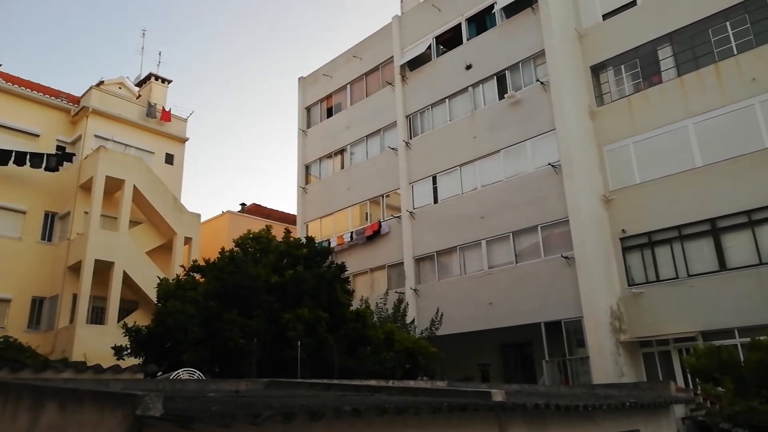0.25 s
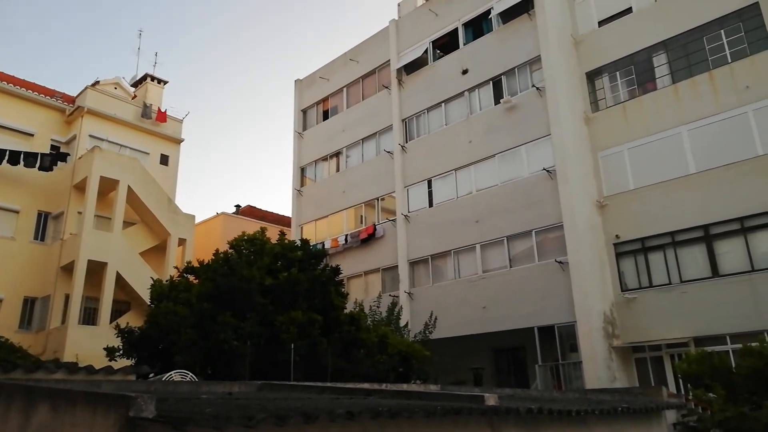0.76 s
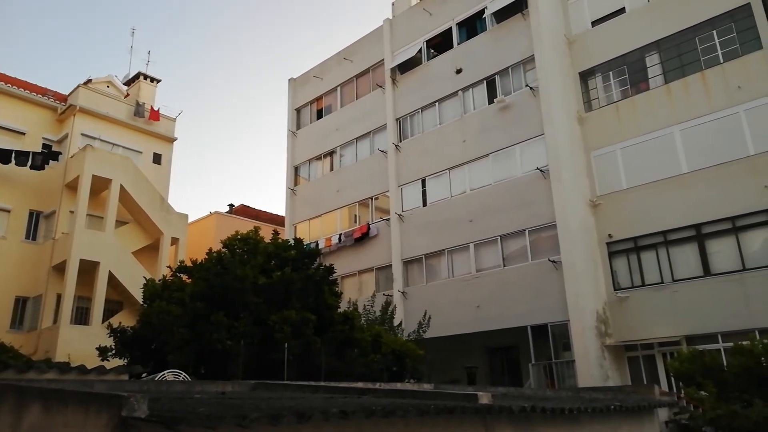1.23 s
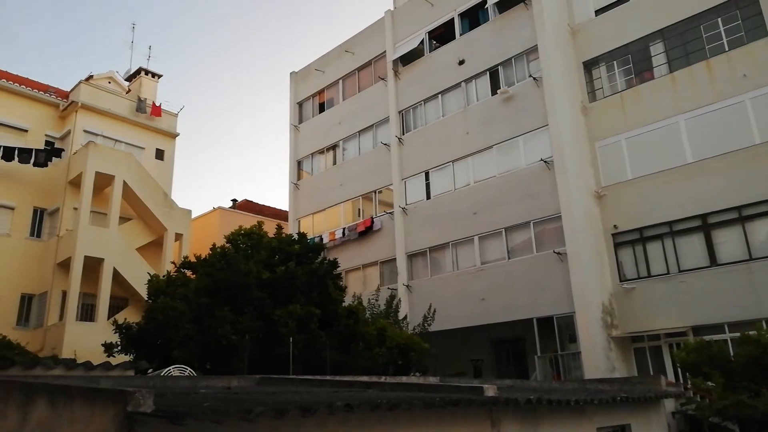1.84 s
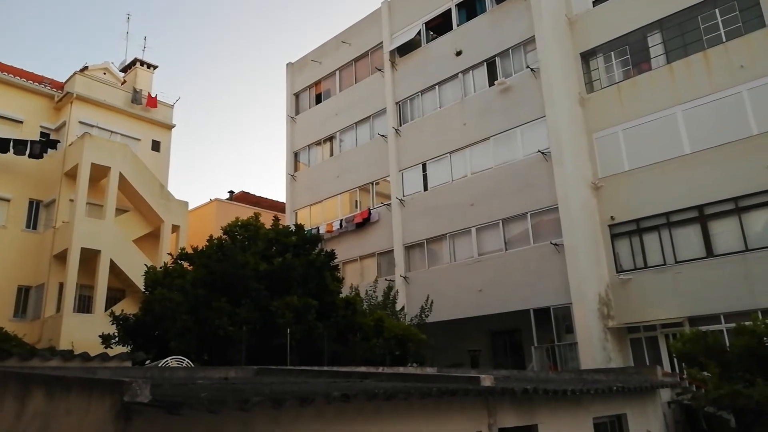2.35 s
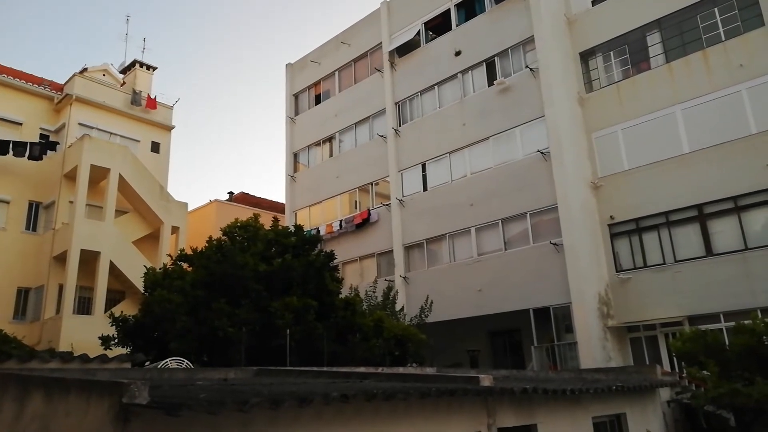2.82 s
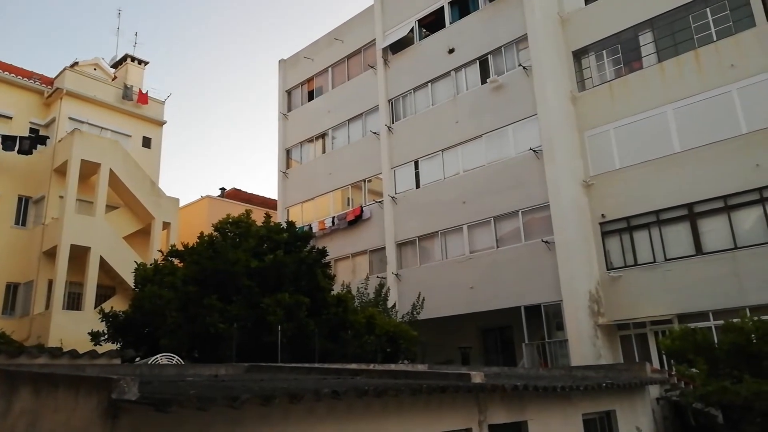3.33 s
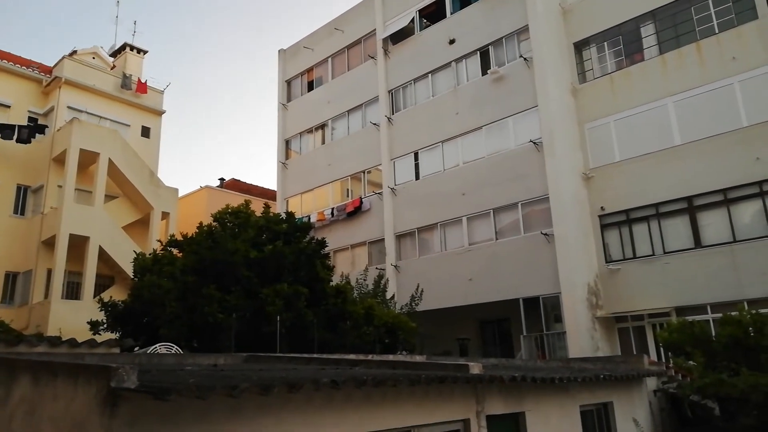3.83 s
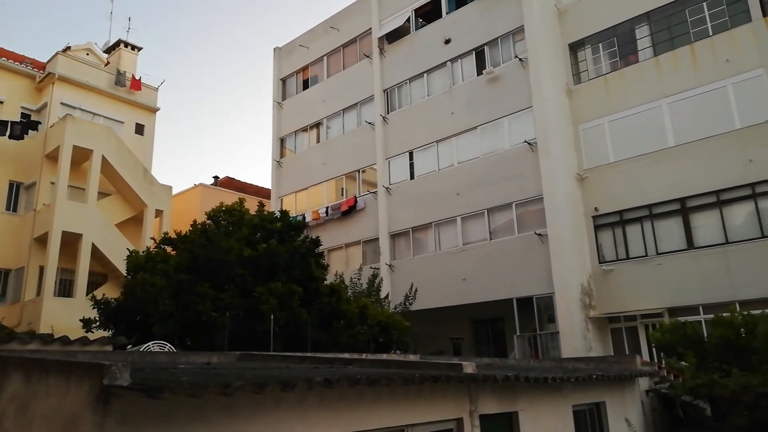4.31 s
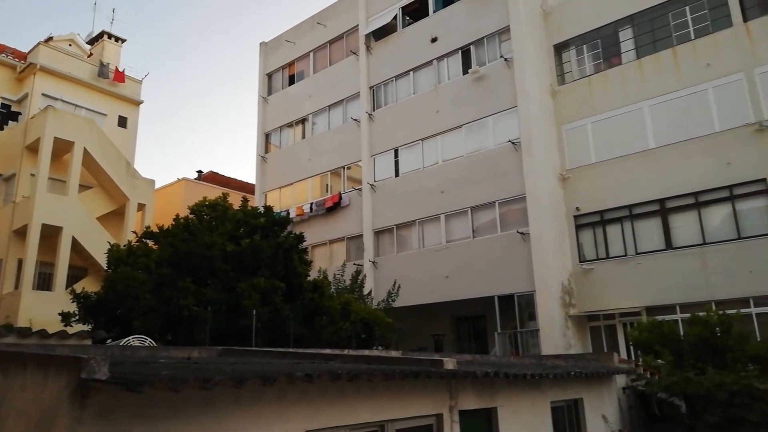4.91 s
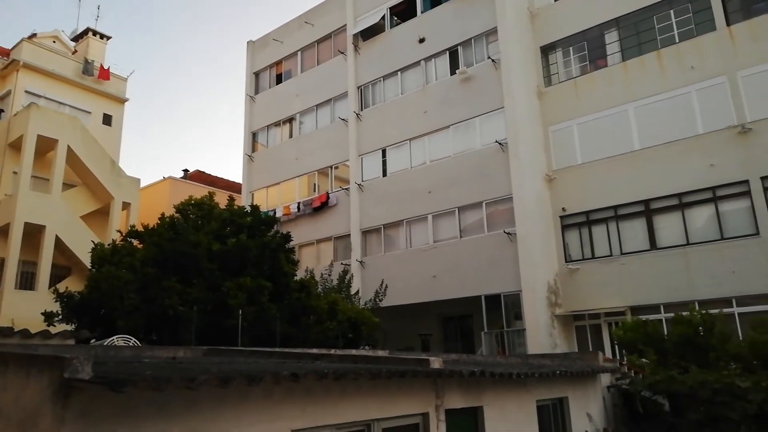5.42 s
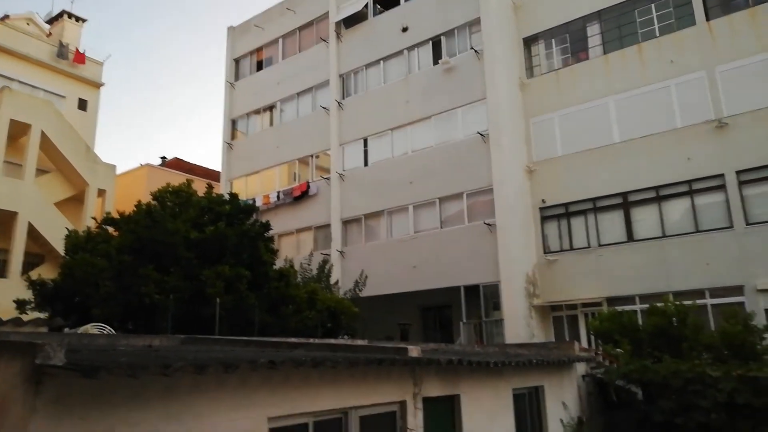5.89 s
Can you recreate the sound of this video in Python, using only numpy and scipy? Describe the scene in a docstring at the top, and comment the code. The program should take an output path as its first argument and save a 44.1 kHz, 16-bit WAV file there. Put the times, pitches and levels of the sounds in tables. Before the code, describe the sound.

For about six seconds house sparrows chirp in a courtyard enclosed by apartment buildings. A sliding chirp on the left opens at 0.1 s, followed by a distant hoarse call and low peeps; a strong stepped chirp comes from the left at 0.8 s. Around 1.4 to 2.2 s left and centre birds alternate quickly. A softer, thinner, higher call comes at 2.5 s, then more falling chirps and peeps crowd together through 3.6 s, where a cheep sits slightly right. A tiny dry tick snaps at 3.9 s. Bright central chirps stand out at 4.2, 5.0 and 5.8 s, with left answers between and a longer faint rasp near 5.5 s. Each note is brief, gritty and mostly falling, with smeared wall echoes and a short tail. Very quiet traffic rumble, slowly sinking, wavering machine hum and faint hiss lie beneath, in wide stereo.

```python
"""Sparrows in a courtyard

House sparrows chirp between apartment blocks on a quiet morning, over the low rumble of the town.
Each chirp is a rough, two-voiced whistle with overtones and a harsh edge of shaped noise.
The facades throw it back as smeared echoes and a fading tail. Hoarse calls and short peeps
come between. Shaped noise makes the traffic and hiss, wavering tones the machine hum."""
import sys
import numpy as np
from scipy import signal
from scipy.fft import rfft, irfft
from scipy.io import wavfile
from scipy.ndimage import uniform_filter1d

SR = 44100
rng = np.random.default_rng(int(sys.argv[2]) if len(sys.argv) > 2 else 0)


def wrap_up_sound(samples):
    """Save the sound to the file named by the first command line argument, as 16-bit audio."""
    columns = np.atleast_2d(samples).T
    # keep every value between -1 and 1, then stretch to whole-number steps
    tamed = np.clip(columns, -1, 1)
    steps = np.round(tamed * 32767).astype(np.int16)
    wavfile.write(sys.argv[1], SR, steps)


N = 271215
TIME, FREQ = np.arange(N) / SR, np.fft.rfftfreq(N, 1 / SR)


def from_db(db):
    """Decibels to gain."""
    return 10 ** (np.asarray(db) / 20)


def rms_one(x):
    """Scale to unit power."""
    return x / np.sqrt(np.mean(x ** 2) + 1e-20)


def at_hz(points, hz):
    """Read a table between its points, on a log-frequency axis."""
    f, value = np.transpose(points)
    return np.interp(np.log(np.maximum(hz, 1)), np.log(f), value)


def panned(db):
    """Left and right gains for a level difference; positive is louder on the left."""
    return from_db(np.array([[db], [-db]]) / 2)


def wander(size, hz):
    """Random motion, mostly slower than the given rate, spread 1."""
    f = np.fft.rfftfreq(size, 1 / SR)
    return rms_one(irfft(rfft(rng.standard_normal(size)) / (1 + (f / hz) ** 2), size))


def coloured(x, spectrum):
    """Shape a sound by a spectrum; rms 1."""
    gain = from_db(at_hz(spectrum, np.fft.rfftfreq(len(x), 1 / SR)))
    return rms_one(irfft(rfft(x) * gain, len(x)))


# how alike the two sides are: pitch_hz, correlation (no unit)
LIKENESS = [(40, .997), (90, 1), (180, 0.96), (300, 0.9), (450, 0.41), (650, 0.42), (1000, 0.1),
            (1500, 0.14), (3000, .02)]
# how far the left side trails: pitch_hz, phase_radians
LEFT_TRAIL = [(30, .03), (120, 0.17), (300, 0.61), (450, 2.18), (650, 3), (1000, 3.25), (1500, 5.6)]


def stereo_noise(spectrum):
    """Noise from all around: long bass waves reach both sides alike, the treble does not; rms 1."""
    mid, side = rfft(rng.standard_normal((2, N)))
    alike = np.clip(at_hz(LIKENESS, FREQ), -.999, .999)
    both = np.sqrt(1 + alike) * mid + np.sqrt(1 - alike) * side * [[1], [-1]]
    both[0] *= np.exp(-1j * at_hz(LEFT_TRAIL, FREQ))
    return rms_one(irfft(both * from_db(at_hz(spectrum, FREQ)), N))


# colour of the far traffic: pitch_hz, relative level_db per Hz
TRAFFIC = [(15, -43), (25, -8), (75, 0), (108, -1.5), (162, -6), (210, -7), (266, -11), (398, -12.5),
           (487, -16), (845, -19), (1030, -18.5), (2000, -27), (2600, -90), (4400, -120)]
TRAFFIC_DB, RUMBLE_DB_PER_S = -59, -.6   # the low end slowly sinks


def traffic_noise(rumble_hz=75):
    """Far traffic: noise that is mostly bass, with the part below rumble_hz slowly sinking."""
    traffic = from_db(TRAFFIC_DB) * stereo_noise(TRAFFIC)
    rumble = irfft(rfft(traffic) / (1 + (FREQ / rumble_hz) ** 4), N)
    rumble_gain = from_db(RUMBLE_DB_PER_S * (TIME - TIME.mean()))
    return traffic + (rumble_gain - 1) * rumble


# upper tones of distant machinery: pitch_hz, level_db
HUM = [(208, -72.5), (390, -78.5)]
# the lowest machine tone swells, sinks and partly returns: time_s, level_db
DRONE_LEVEL = [(0, -63), (2.4, -66.5), (2.78, -63.5), (3.1, -60), (4.4, -88), (6.15, -71)]
DRONE_HZ = 99


def machine_hum(waver_hz=7):
    """Distant machinery: low tones whose strength and phase waver at random."""
    tones = [(DRONE_HZ, np.interp(TIME, *np.transpose(DRONE_LEVEL)))] + HUM
    hum = np.zeros(N)
    for hz, db in tones:
        waver = wander(N, waver_hz) + 1j * wander(N, waver_hz)
        hum += from_db(db) * rms_one(np.real(waver * np.exp(2j * np.pi * hz * TIME)))
    return hum


# colour of the faint hiss: pitch_hz, relative level_db per Hz
AIR = [(1300, -12), (2100, -6), (3300, 6.5), (4500, 2.5), (6000, -5.5), (9000, -6.5), (12500, -8.5),
       (15500, -16)]
AIR_DB = -62


def air_hiss():
    """A faint steady hiss, made of noise."""
    return from_db(AIR_DB) * stereo_noise(AIR)


# what the beak lets through of the overtones: pitch_hz, gain_db
BEAK = [(5000, 9), (6500, -8), (8000, -11), (9300, -2), (10300, 3), (11800, 2), (13000, -16), (15500, -25)]


def syrinx(pitch, overtones_db, rough, jitter=0.087, jitter_hz=520, shimmer_db=7,
           third_db=-2, fourth_db=-9):
    """One vibrating membrane: a whistle with fast flutter and weak overtones."""
    flutter = wander(len(pitch), jitter_hz)
    flutter = flutter - uniform_filter1d(flutter, size=200)   # each note keeps its centre pitch
    phase = 2 * np.pi * np.cumsum(pitch * (1 + jitter * rough * rms_one(flutter))) / SR
    voice = np.sin(phase)
    for k, db in enumerate([0, third_db, fourth_db], 2):
        gain = from_db(overtones_db + db + at_hz(BEAK, k * pitch))
        voice += gain * np.sin(k * phase) * (k * pitch < SR / 2)
    shimmer = 2 * np.tanh(wander(len(pitch), 118) / 2)   # fast uneven loudness, kept in bounds
    return rms_one(voice * from_db(shimmer_db * rough * shimmer))


# low and high throat resonance, colouring the harsh part: pitch_hz, relative level_db per Hz
THROAT_LOW = [(2000, -52), (2900, -39), (3600, 2.5), (4400, 2.5), (5200, -7), (5700, -9), (7000, -49)]
THROAT_HIGH = [(4800, -39), (6300, -8.5), (7800, 4.5), (9200, -26.5), (10200, 9), (11800, 1.5),
               (12800, -12), (15500, -59)]


def chirp(shape, ratio, length, swell, overtones_db, rough, upper_hz=4750, upper_follow=.45,
          upper_db=-11, harsh_db=-7, edge_db=-5, main_bright_db=-4, upper_bright_db=6,
          edge_fade_db=55, grain_db=4):
    """Both sides of the syrinx sing; irregular vibration adds a harsh edge, keenest at the start."""
    s, hz, db = np.transpose(shape)
    t = np.arange(s[0] * length, s[-1] * length, 1 / SR)
    from_middle = t - t.mean()
    pitch = ratio * np.interp(t, s * length, hz)
    # the weaker voice follows only part of the way, staying closer to upper_hz
    pivot = upper_hz * ratio
    upper = pivot * (pitch / pivot) ** upper_follow
    bright_db = overtones_db - edge_fade_db * from_middle
    voices = syrinx(pitch, bright_db + main_bright_db, rough)
    voices += from_db(upper_db) * syrinx(upper, bright_db + upper_bright_db, rough + 0.3)
    grit = rng.standard_normal(len(t)) * from_db(grain_db * wander(len(t), 250))
    voices += rough * from_db(harsh_db) * coloured(grit, THROAT_LOW)
    voices += from_db(bright_db + edge_db) * coloured(grit, THROAT_HIGH)
    return t[0], voices * from_db(np.interp(t, s * length, db) + swell * from_middle)


FADE_DB = 26   # depth of every attack and release
ACCENT_S = 0.022   # the first push dies away in this time, before stretching
LEAD_S, LEAD_RISE_DB = .028, 14   # lead-in note: duration before stretching, and rise
LEAP_DIP_DB, LEAP_OCTAVES_PER_S = 4, 42   # the voice weakens while its pitch leaps


def sing(contour, length, swell, attack_s, hold_s, release_s, accent_db, overtones_db, rough,
         lead=None, ratio=1):
    """One breath: optional lead-in, attack, accent, hold and release; length stretches all its times."""
    s = np.arange(-attack_s, hold_s + release_s, 1 / SR)
    hz = np.interp(s, *np.transpose(contour))
    corners = [-attack_s, 0, hold_s, hold_s + release_s]
    db = np.interp(s, corners, [-FADE_DB, 0, 0, -FADE_DB])
    db += accent_db * np.exp(-np.abs(s) / ACCENT_S)
    db -= LEAP_DIP_DB * np.tanh(np.gradient(np.log2(hz), s) / LEAP_OCTAVES_PER_S) ** 2
    shape = np.column_stack([s, hz, db])
    if lead:
        # (share of LEAD_S before the call, share of LEAD_RISE_DB below the peak)
        steps = ((1, 1), (1 / 3, 0), (1 / 20, 1 / 2))
        rise = [(-attack_s - LEAD_S * before, lead["hz"], lead["db"] - LEAD_RISE_DB * weak)
                for before, weak in steps]
        shape = np.vstack([rise, shape])
    return chirp(shape, ratio, length, swell, overtones_db, rough)


def stairs(notes_hz, step_s, glide_share):
    """Pitch contour of held notes at an even pace, joined by quick glides: (s, Hz)."""
    held = 1 - np.clip(glide_share, .05, .95)
    return [((k + part) * step_s, hz) for k, hz in enumerate(notes_hz) for part in (0, held)]


def placed(rows, contour, voice):
    """Sing each row as (start_s, (offset_s, sound), level_db, left_minus_right_db, echo_db)."""
    for s, length, db, swell, pan, echo_db in rows:
        yield s, sing(contour, length, swell, **voice), db, pan, echo_db


# All call levels are relative; scene() lifts the birds together. Times inside a call are unstretched.
# staircase: notes_hz, step_s, glide_share (0-1)
SLURRED = dict(notes_hz=[4673, 4243, 3584, 3374, 2705], step_s=.0215, glide_share=0.44)
# voice: attack_s, hold_s, release_s, accent_db, overtones_db, rough (no unit)
SLURRED_VOICE = dict(attack_s=.005, hold_s=0.075, release_s=0.032, accent_db=1, overtones_db=-14, rough=0.65)
# chirps: accent_s, length (ratio), level_db, swell_db_per_s, left_minus_right_db, echo_db
SLURRED_CHIRPS = [ (.104, 1.15, -46.5, 21, 9.1, 3), (1.438, 1.17, -45, -17, 7.2, -2),
                  (3.297, .99, -46.5, 5, 0.67, -0.5), (4.767, 1.01, -45, 7, 3.6, -1)]


def slurred_chirps():
    """The sparrow on the left: a throat sliding down five notes with long glides."""
    return placed(SLURRED_CHIRPS, stairs(**SLURRED), SLURRED_VOICE)


# pitch path: time_s from the accent, pitch_hz
RASP = [(-.045, 4900), (0, 5400), (.045, 7000), (.07, 6000), (.16, 5000)]
# voice: attack_s, hold_s, release_s, accent_db, overtones_db
RASP_VOICE = dict(attack_s=.045, hold_s=0.19, release_s=.03, accent_db=-0.5, overtones_db=-9.5)
# hoarse calls from farther off: accent_s, length (ratio), level_db, left_minus_right_db
RASPS = [(.26, 0.66, -59.5, -0.5), (1.234, 0.59, -68.5, -1), (1.939, 0.78, -62, 0.5),
         (3.113, .89, -61.5, 3), (5.535, 1.42, -59.5, 1.5)]
RASP_SWELL_DB_PER_S, RASP_ECHO_DB, RASP_ROUGH = -47, 1, 1.0


def hoarse_calls():
    """Farther birds whose strong flutter and grit make the whistle hoarse."""
    for s, length, db, pan in RASPS:
        call = sing(RASP, length, RASP_SWELL_DB_PER_S, rough=RASP_ROUGH, **RASP_VOICE)
        yield s, call, db, pan, RASP_ECHO_DB


# pitch path, moved to each peep's top pitch: time_s from the accent, pitch_hz
PEEP = [(-.02, 3755), (.025, 4366), (.1, 4100)]
# voice: attack_s, hold_s, release_s, accent_db, overtones_db
PEEP_VOICE = dict(attack_s=.04, hold_s=0.029, release_s=.055, accent_db=2, overtones_db=-21.5)
# peeps from all round: accent_s, top_pitch_hz, length (ratio), level_db, rough (no unit),
# left_minus_right_db
PEEPS = [ (.44, 4350, 1.24, -54.5, .4, -1), (.485, 2807, 0.84, -56, 0.7, -0.5),
         (0.689, 4385, 1.5, -65.5, .15, 3), (1.231, 2910, 1.25, -60.5, .85, -2.5),
         (1.239, 3960, 1.17, -61.5, 1, -1), (1.884, 4770, 1.8, -59, .4, 4.5),
         (2.169, 2856, 0.79, -51.5, .5, 0.5), (2.889, 3683, 1.1, -44.5, 0.7, 1),
         (3.402, 4213, 0.99, -49.5, 0.46, -1), (3.45, 3394, .6, -48, 1.04, -6),
         (3.875, 2905, 0.92, -62, 0.87, -7), (3.94, 3724, 1.4, -59.5, 0.9, -1),
         (3.951, 1930, 1.0, -71, 1.1, 0), (4.375, 4305, 1, -49, 0.8, 10), (4.975, 4390, 0.76, -51, 0.9, -1),
         (5.04, 2615, 1.1, -64, 0.7, -12), (5.625, 2900, 0.77, -57.5, 0.82, 0),
         (5.711, 1810, .55, -64, .95, 4)]
PEEP_ECHO_DB = -1.8


def peeps():
    """Short peeps from all round the courtyard: one rise and fall of pitch, at many heights."""
    for s, top_hz, length, db, rough, pan in PEEPS:
        call = sing(PEEP, length, 0, rough=rough, ratio=top_hz / np.max(PEEP), **PEEP_VOICE)
        yield s, call, db, pan, PEEP_ECHO_DB


# staircase: notes_hz, step_s, glide_share (0-1)
STEPPED = dict(notes_hz=[4705, 3940, 3260, 3920, 2990, 3290, 2746], step_s=.0178, glide_share=.25)
# voice: attack_s, hold_s, release_s, accent_db, overtones_db, rough (no unit), lead (hz, db)
STEPPED_VOICE = dict(attack_s=.0045, hold_s=0.096, release_s=.024, accent_db=-0.5, overtones_db=-12.5, rough=0.48, lead=dict(hz=6052, db=-10.5))
# chirps: accent_s, length (ratio), level_db, swell_db_per_s, left_minus_right_db, echo_db
STEPPED_CHIRPS = [ (.819, 0.99, -41, -8, 5.5, -1.5), (2.012, 1.16, -42.5, -26, 5, -2.5),
                  (2.741, 0.95, -44, -41, 6.5, .5), (4.108, .94, -46, -74, 10.5, 2),
                  (5.404, 1.21, -46, -75, 4.5, 0)]


def stepped_chirps():
    """The left sparrow's other chirp: a thin lead-in, then an uneven fall through held notes."""
    return placed(STEPPED_CHIRPS, stairs(**STEPPED), STEPPED_VOICE)


# pitch path: time_s from the accent, pitch_hz
SWUNG = [(-.008, 4200), (.005, 5250), (.018, 3980), (.036, 3740), (.047, 4112), (.058, 3386), (.078, 2950),
         (0.114, 2742)]
# voice: attack_s, hold_s, release_s, accent_db, overtones_db, rough (no unit)
SWUNG_VOICE = dict(attack_s=.024, hold_s=0.062, release_s=0.075, accent_db=-2, overtones_db=-17.5, rough=0.57)
# chirps: accent_s, length (ratio), level_db, swell_db_per_s, left_minus_right_db, echo_db
SWUNG_CHIRPS = [ (1.651, 1.12, -43.5, -3, 0, -8), (2.231, 1.025, -41.5, 11, -1, -10),
                (3.015, 0.82, -44, 17, -0.5, -1.5), (4.24, 0.86, -40, 14, -0.5, -3),
                (5.02, 1.08, -40, 2, -0.5, -9), (5.768, 1.06, -40.5, -10, 0, -10)]


def swung_chirps():
    """A sparrow near the middle: the membrane's pitch swings up twice and falls away."""
    return placed(SWUNG_CHIRPS, SWUNG, SWUNG_VOICE)


# pitch path: time_s from the accent, pitch_hz
THIN = [(-.012, 5535), (0.02, 6300), (.062, 5810), (.086, 4950), (.13, 4400)]
# voice: attack_s, hold_s, release_s, accent_db, overtones_db, rough (no unit), lead (hz, db)
THIN_VOICE = dict(attack_s=0.011, hold_s=0.12, release_s=.04, accent_db=5.5, overtones_db=-13.5, rough=0.6, lead=dict(hz=7766, db=-1.5))
# call: accent_s, length (ratio), level_db, swell_db_per_s, left_minus_right_db, echo_db
THIN_CALLS = [(2.488, 0.87, -52, 0, 1.8, 0)]


def thin_call():
    """A softer, higher call: a strong lead-in note, then a rise and a long fall."""
    return placed(THIN_CALLS, THIN, THIN_VOICE)


# pitch path: time_s from the accent, pitch_hz
CHEEP = [(-.004, 3960), (.005, 4320), (.021, 4495), (.044, 4340), (.054, 3310), (0.084, 3160)]
# voice: attack_s, hold_s, release_s, accent_db, overtones_db, rough (no unit), lead (hz, db)
CHEEP_VOICE = dict(attack_s=.01, hold_s=0.072, release_s=.016, accent_db=2, overtones_db=-11, rough=0.53, lead=dict(hz=6240, db=-8))
# call: accent_s, length (ratio), level_db, swell_db_per_s, left_minus_right_db, echo_db
CHEEPS = [(3.604, 1, -45, -25, -4, -2.2)]


def cheep():
    """A cheep: the pitch arches gently, then drops quickly."""
    return placed(CHEEPS, CHEEP, CHEEP_VOICE)


NEAR_FADE_S = .008   # reflections by the perch are over quickly


def near_walls(x, near_db=-2.5, count=9):
    """Eaves and ledges by the perch add a few quick reflections, different for every call and side."""
    taps = np.zeros((2, SR // 20))
    for side in taps:
        at = rng.integers(SR // 1000, SR // 40, count)
        side[at] = rng.choice([-1, 1], count) * np.exp(-at / SR / NEAR_FADE_S)
        side *= from_db(near_db) / np.linalg.norm(side)
    taps[:, 0] = 1   # the call itself
    return signal.fftconvolve(x[None], taps, axes=1) / np.linalg.norm(taps[0])


# facade echoes: delay_s, level_db, left_minus_right_db
FACADES = [(0.013, -1, 0.5), (0.029, -10.5, 3.5), (0.046, -2, 3), (0.073, -11, -0.5), (0.106, -12.5, -2.5),
           (.14, -10.5, -1), (0.192, -17.5, 7.5)]
# time for the tail to fall by 60 dB: pitch_hz, fall_s
COURTYARD = [(2000, 0.65), (4000, 0.77), (7000, 0.68), (11000, 0.29), (15000, 0.62)]


def courtyard(x, build_s=0.024, tail_db=0.0, scatter_s=0.002):
    """Balconies smear each facade echo; later bounces merge into a tail, each band fading at its rate."""
    t = TIME[:SR]
    white = rfft(rng.standard_normal((2, SR)))
    centres = np.geomspace(1500, 16000, 8)
    tail = np.zeros((2, SR))
    for hz, share in zip(centres, np.eye(len(centres))):
        band = irfft(white * np.interp(np.arange(white.shape[1]), centres, share), SR)
        tail += band * from_db(-60 * t / at_hz(COURTYARD, hz))
    response = from_db(tail_db) * rms_one(tail * (1 - np.exp(-t / build_s))) / np.sqrt(SR)
    for delay, db, pan in FACADES:
        fade = np.exp(-np.abs(t - delay) / scatter_s) * (t >= delay)
        smear = rng.standard_normal((2, SR)) * fade
        response += from_db(db) * panned(pan) * rms_one(smear) / np.sqrt(SR)
    return signal.fftconvolve(x, response, axes=1)[:, :N]


SIDE_LAG_S = .0003   # most that either side is shifted in time


def birds(echo_pan_share=0.19):
    """Sound travels from each perch directly and again by way of the facades."""
    direct, to_walls = np.zeros((2, 2, N))
    for kind in (slurred_chirps, hoarse_calls, peeps, stepped_chirps, swung_chirps, thin_call, cheep):
        for s, (offset, call), db, pan, echo_db in kind():
            near = near_walls(call)
            clock = s + offset + np.arange(near.shape[1]) / SR
            lag = SIDE_LAG_S * np.tanh(pan)   # the louder side hears it first
            sides = [np.interp(TIME + shift, clock, side, 0, 0)
                     for shift, side in zip((lag, -lag), near)]
            direct += from_db(db) * panned(pan) * sides
            plain = np.interp(TIME, clock[:len(call)], call, 0, 0)
            to_walls += from_db(db + echo_db) * panned(pan * echo_pan_share) * plain
    return direct + courtyard(to_walls)


# a tiny dry tick: start_s, level_db
TICK = (3.875, -45)


def tick(fade_s=0.00074):
    """A short, bright snap: a burst of treble noise that dies away at once."""
    s, db = TICK
    snap = coloured(rng.standard_normal(N), THROAT_HIGH)
    return from_db(db) * snap * np.exp(-np.abs(TIME - s) / fade_s) * (TIME >= s)


def scene():
    """Birds over the town, with one tick."""
    town = traffic_noise() + machine_hum() + air_hiss()
    return town + from_db(2.0) * birds() + tick()


# the two microphones differ in colour: pitch_hz, left_minus_right_db
MICROPHONES = [(100, 0.5), (800, -1.5), (2700, -2.2), (4300, -2), (5000, 0.5), (7800, 0.5), (9900, 5.5),
               (11200, -1), (13200, -4)]
CUTOFF_HZ = 15720


def record(dry):
    """Each microphone has its own colour; everything above the cutoff is removed steeply."""
    colour = from_db(at_hz(MICROPHONES, FREQ) * np.array([[1], [-1]]) / 2)
    return irfft(rfft(dry) * colour / np.sqrt(1 + (FREQ / CUTOFF_HZ) ** 300), N)


dry = scene()
out = record(dry)
wrap_up_sound(out)
```